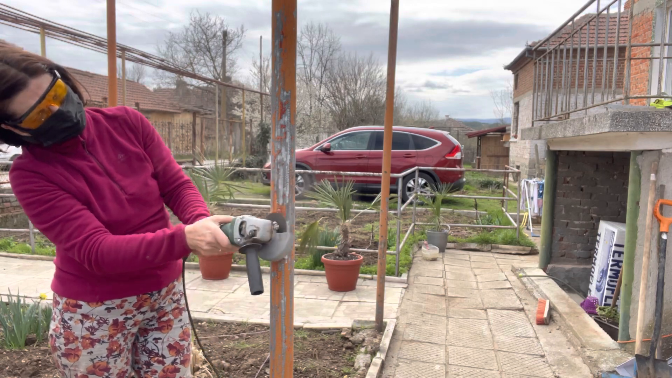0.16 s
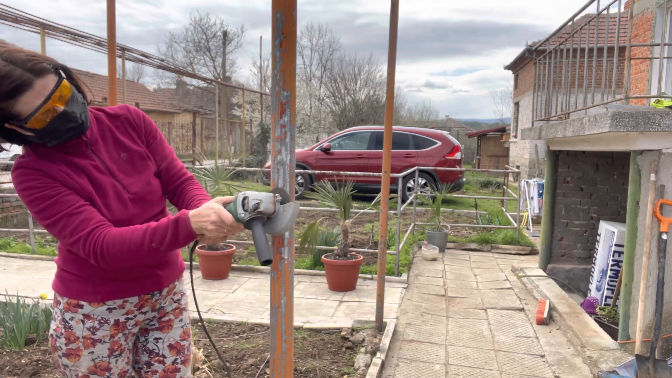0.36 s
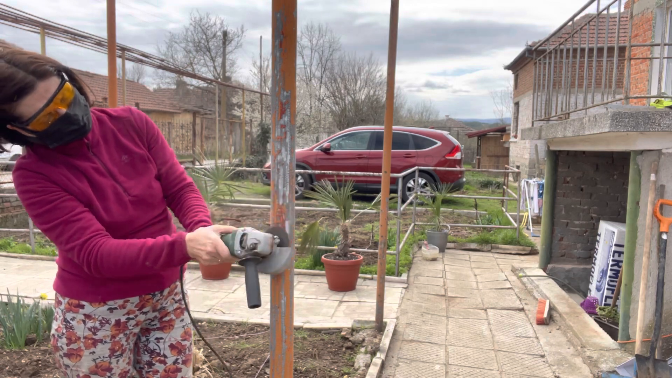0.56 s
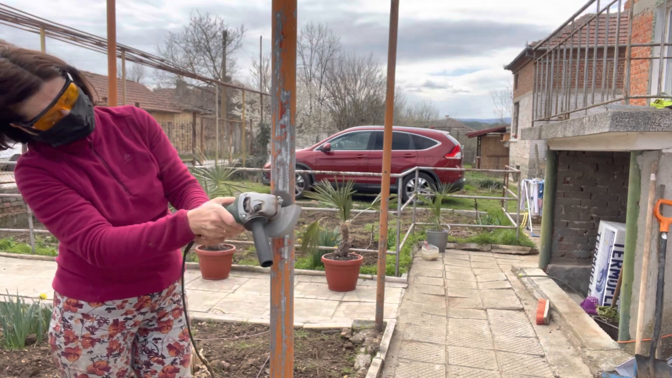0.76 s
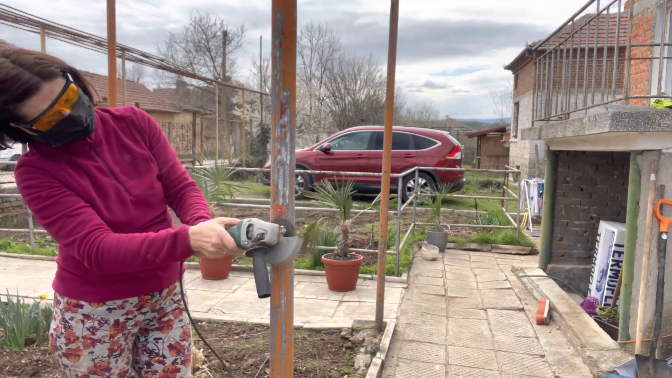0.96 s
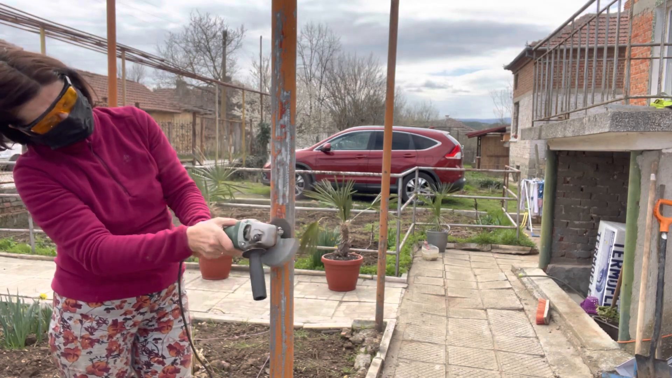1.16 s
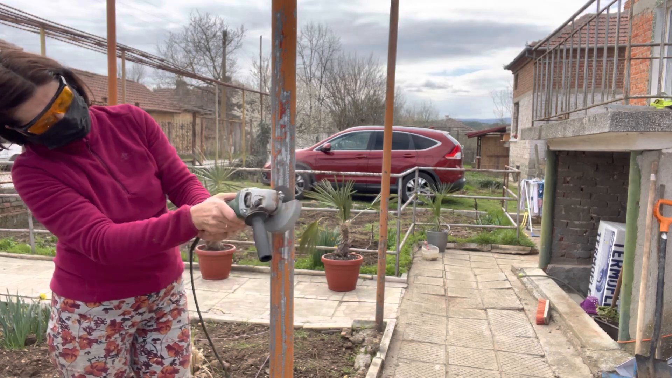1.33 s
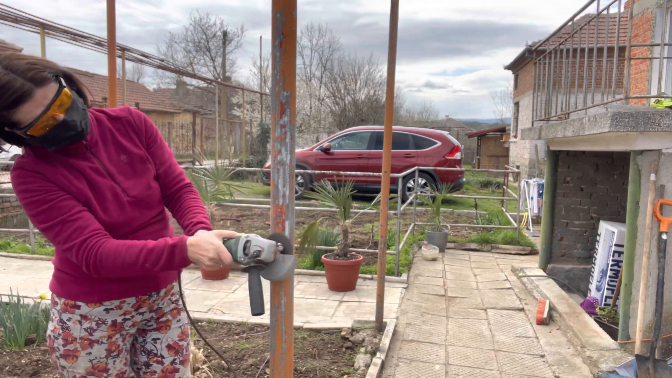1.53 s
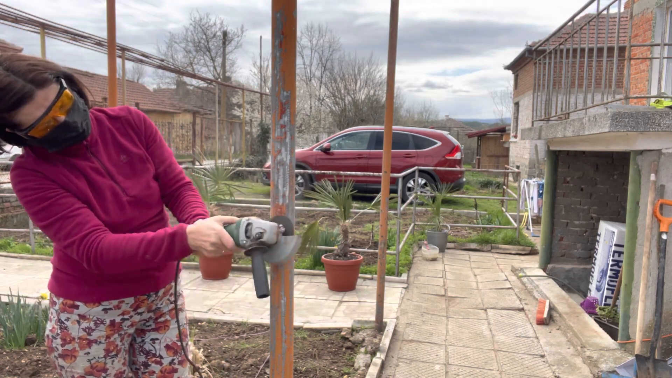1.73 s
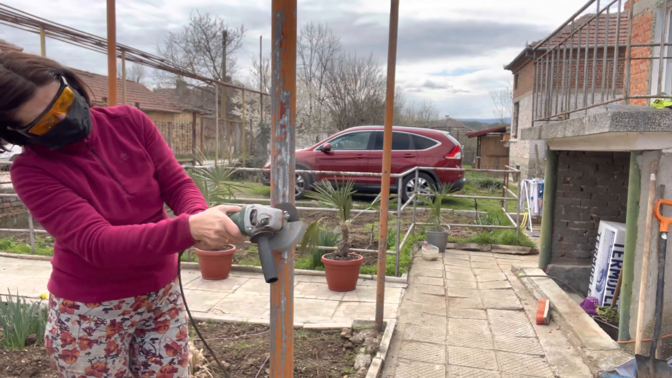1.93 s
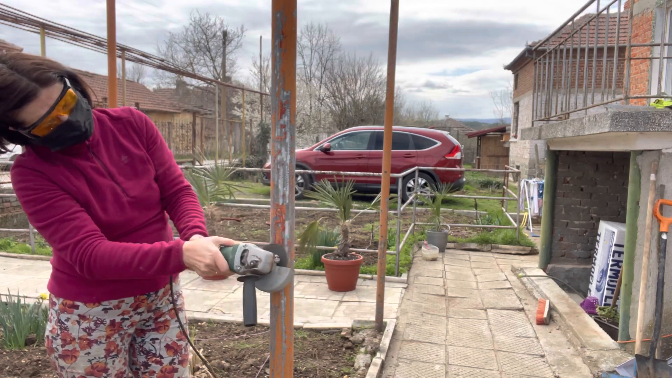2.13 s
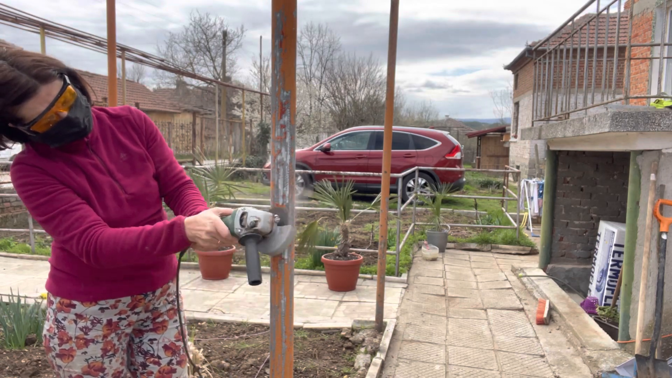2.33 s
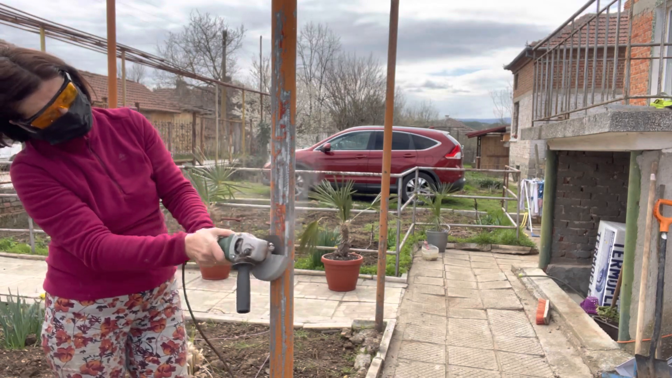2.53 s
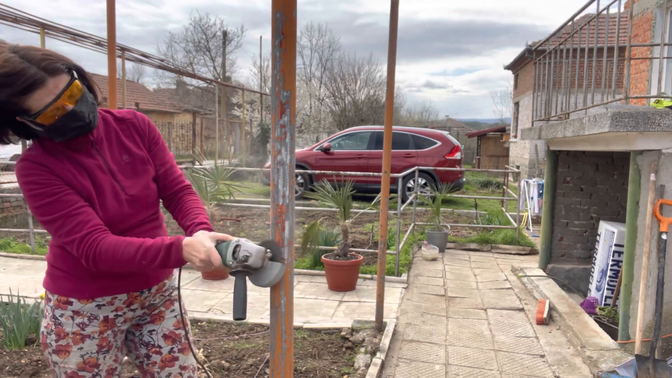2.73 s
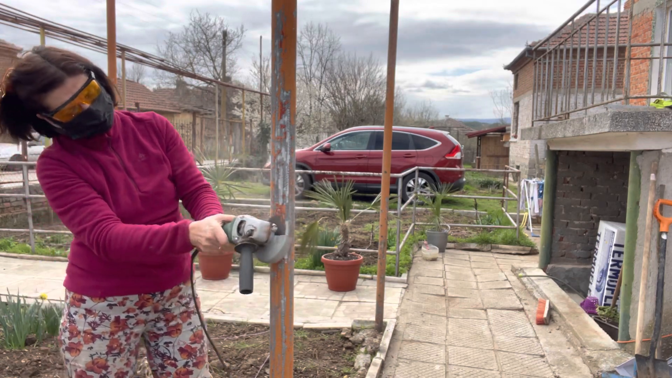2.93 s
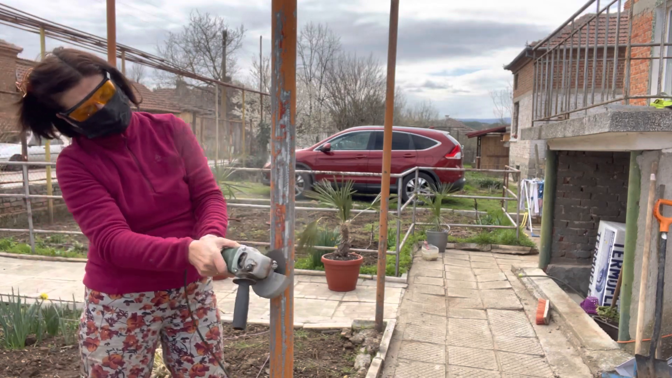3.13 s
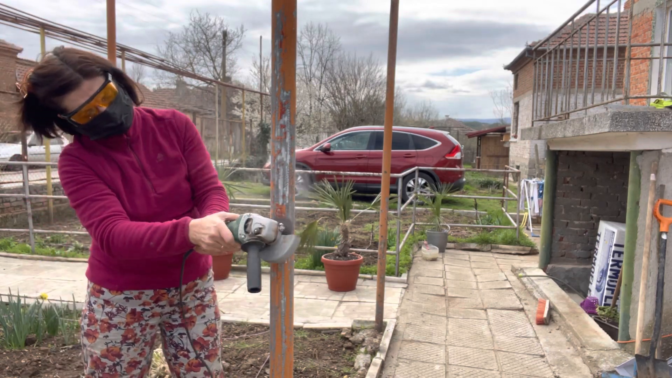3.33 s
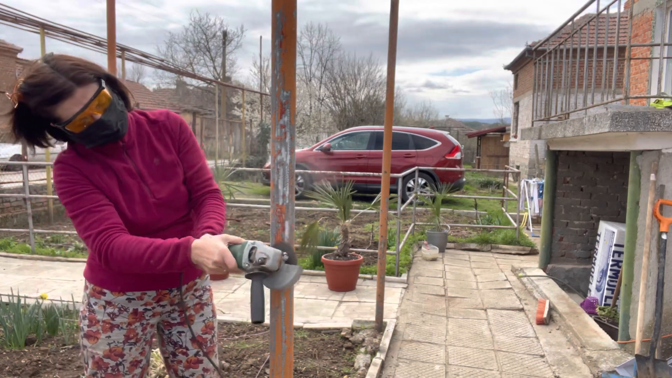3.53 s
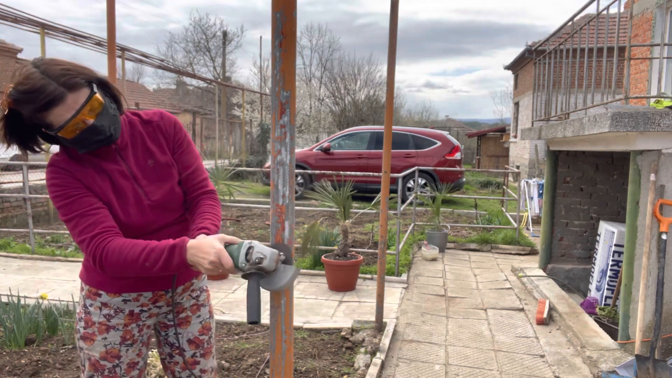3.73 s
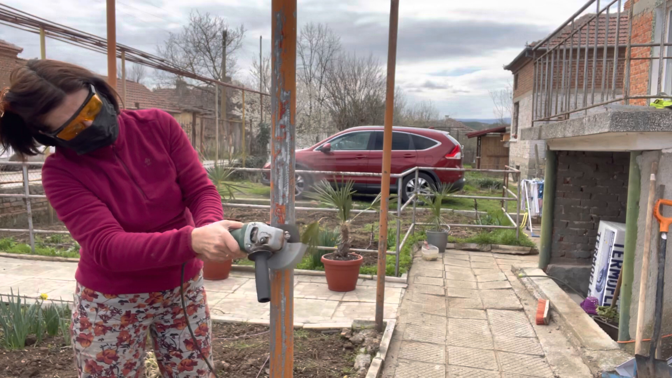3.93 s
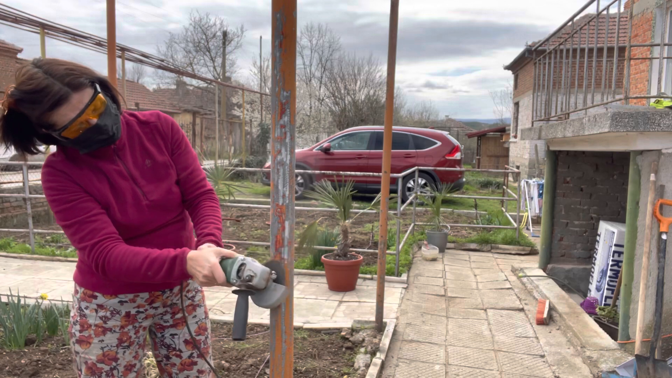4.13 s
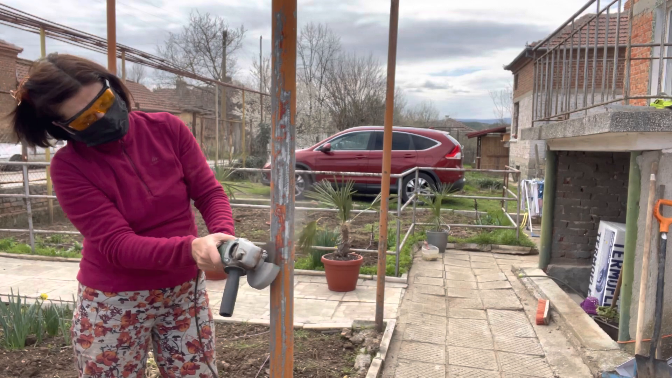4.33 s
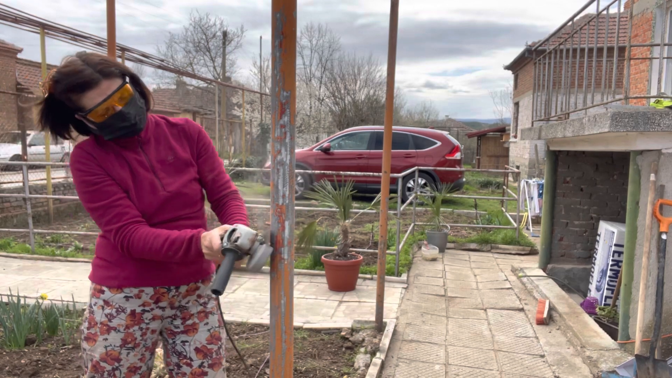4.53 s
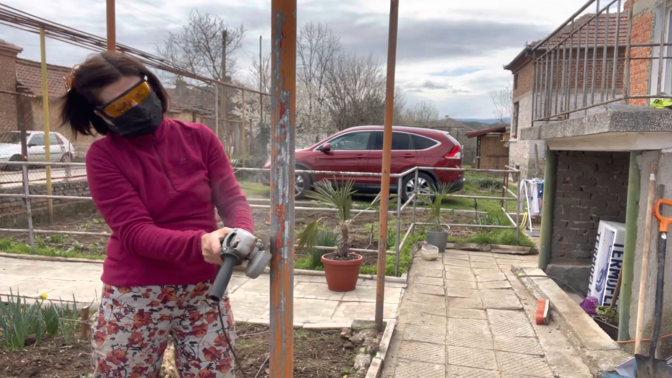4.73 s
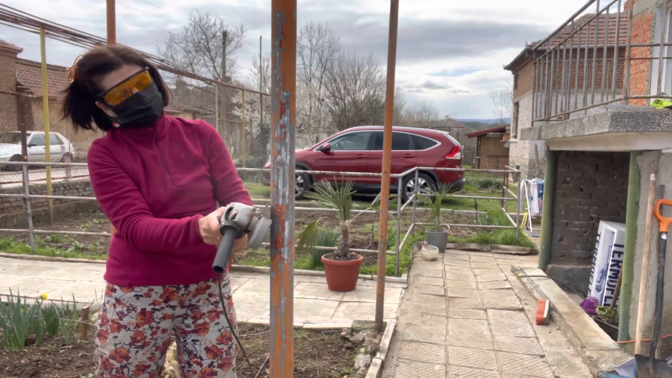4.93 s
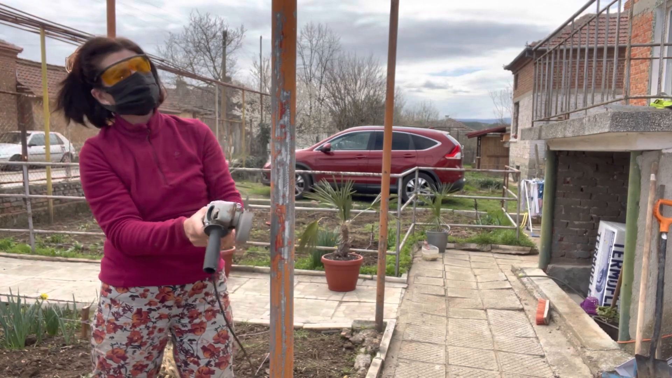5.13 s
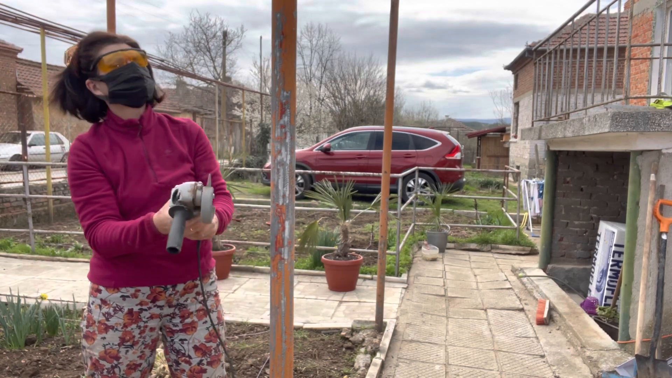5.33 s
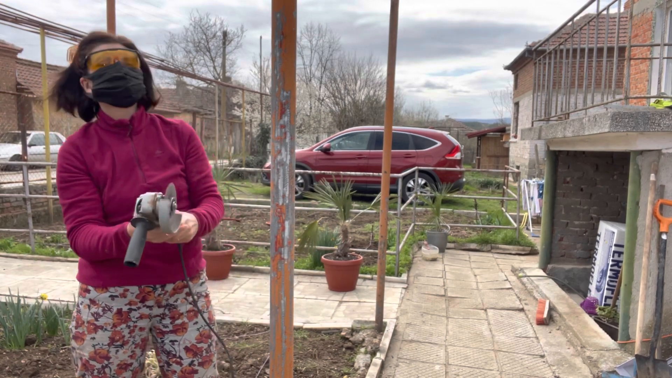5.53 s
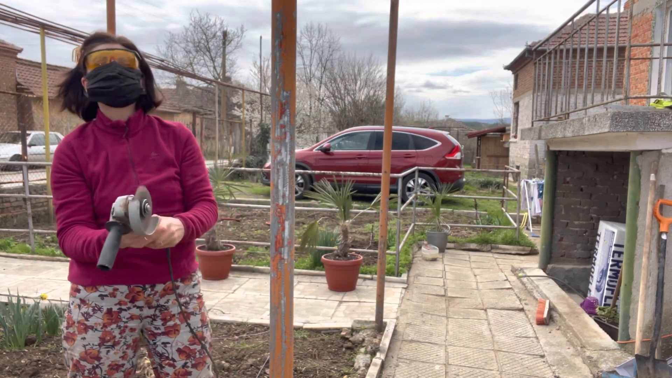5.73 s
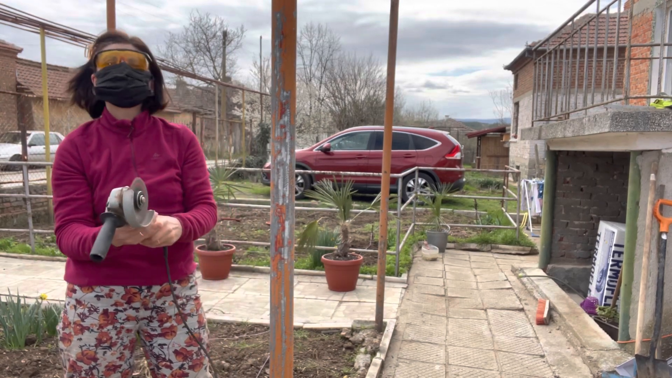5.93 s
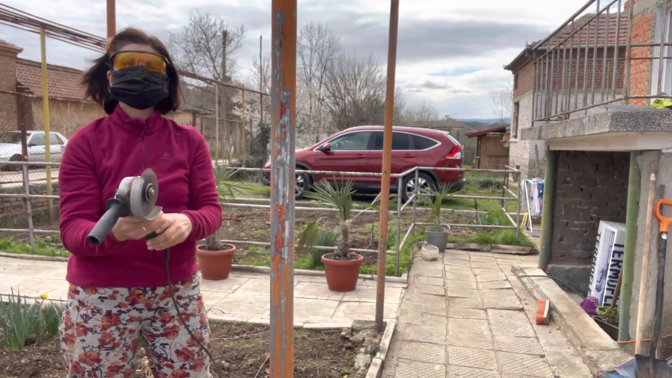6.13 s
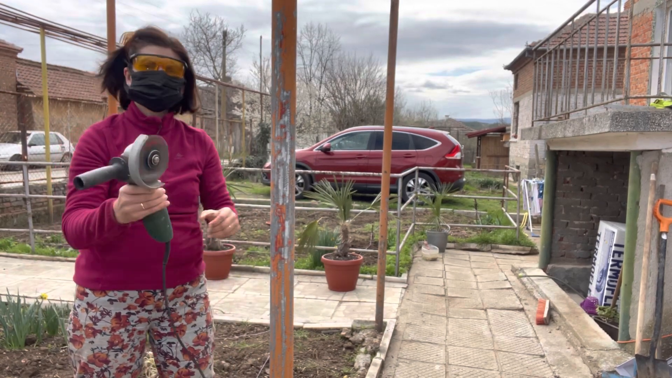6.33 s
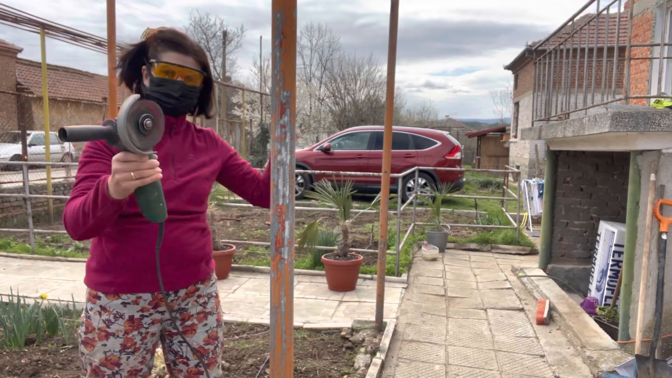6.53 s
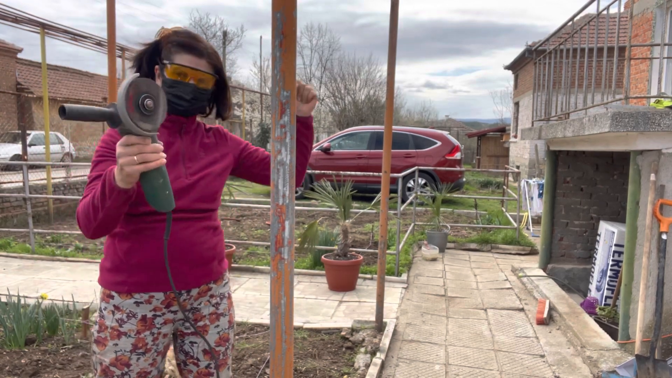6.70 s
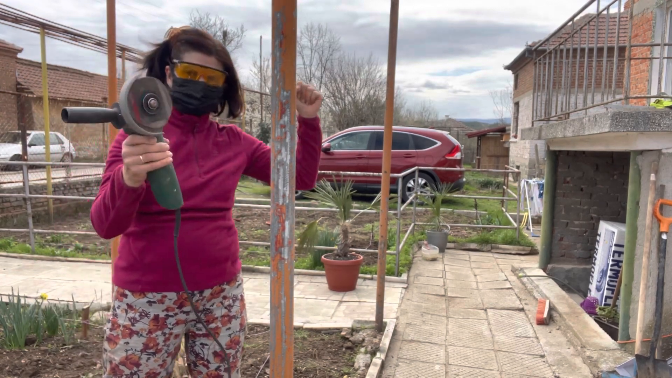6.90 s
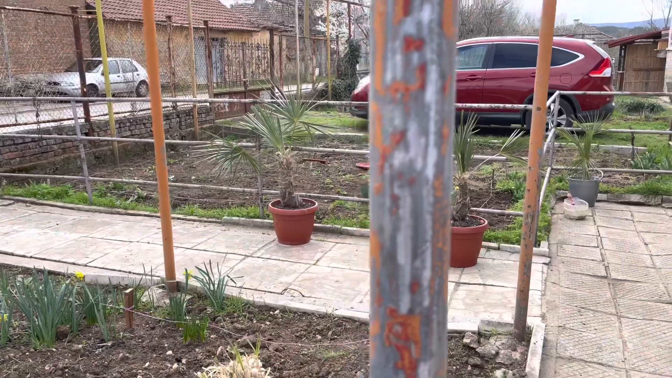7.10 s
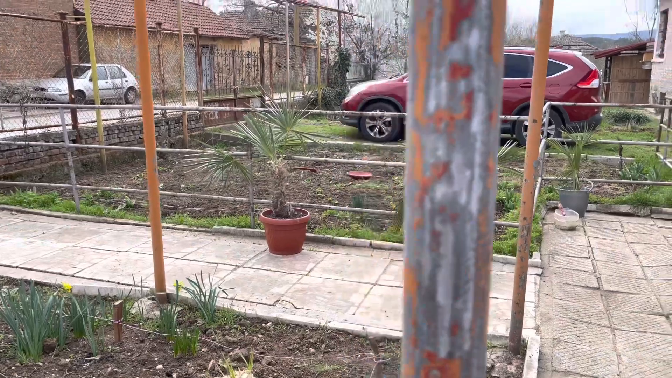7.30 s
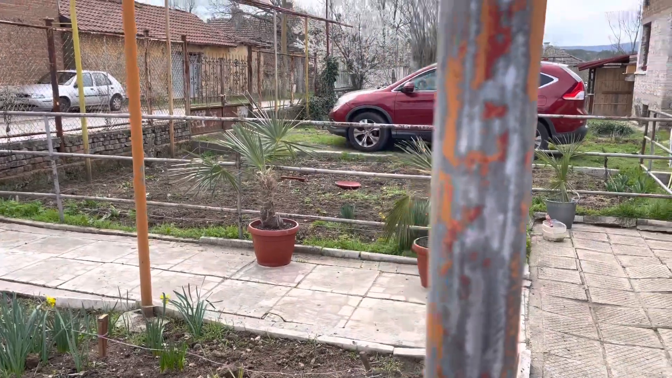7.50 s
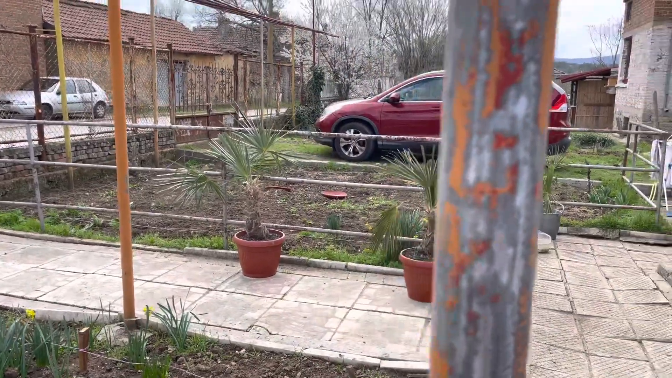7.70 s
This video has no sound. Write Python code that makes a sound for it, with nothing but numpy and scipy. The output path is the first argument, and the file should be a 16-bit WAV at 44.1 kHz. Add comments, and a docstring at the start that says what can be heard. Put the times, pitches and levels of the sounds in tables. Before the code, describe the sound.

Outdoors, fairly close, an angle grinder is already pressed to a rusty steel post. From 0 to about 4.7 s it works in overlapping strokes roughly half a second long: a dense rough buzz, rapid chatter and bright gritty hiss, with short singing overtones and metallic ringing. The speed sags slightly under pressure, and the bites become harsher around 3.6 to 4.4 s. At 4.7 s the motor is switched off; pitch drops and the scraping thins, ending near 5.2 s with fading post ring and small ticks. The freed tool whirrs down, its gear whine gliding lower over fan rush and brush fizz, with faint gear ticking near 7 s. Wind buffets thump the microphone, strongest around 6.4 s. At 7.3 s everything breaks off. After a tiny gap, low wind returns with clicks, finger rubs and taps on a case until nearly 7.8 s.

```python
"""An open yard: an angle grinder scours a rusty steel post, is switched off, lifted away and winds down.
The disc's rotation drives knocks, chattering bumps and overtones; noise makes its grit hiss; the post rings along.
Gear and brush tones glide down with the speed, while filtered noise makes the wind on the microphone.
Near 7.3 s everything stops abruptly; after a brief gap the wind returns and fingers slide and tap on a case."""
import sys
import numpy as np
from scipy import signal
from scipy.fft import rfft, irfft
from scipy.io import wavfile
from scipy.ndimage import uniform_filter1d, map_coordinates

SR = 44100
rng = np.random.default_rng(int(sys.argv[2]) if len(sys.argv) > 2 else 0)


def master(y):
    """Save y as 16-bit WAV."""
    cut = np.clip(np.atleast_2d(y).T, -1, 1)
    pcm = np.round(cut * 32767)  # scale
    wavfile.write(sys.argv[1], SR, pcm.astype(np.int16))


N = 342216
T, HZ = np.arange(N) / SR, np.fft.rfftfreq(N, 1 / SR)
EDGE_HZ = 15850  # upper limit of the whole sound
GEAR = 3.5  # motor turns per spindle turn
STOP_S = 7.305  # the tool and the first wind break off


def amp(db):
    """Decibels to gain."""
    return 10 ** (np.asarray(db) / 20)


def unit(x):
    """Scales to an rms of 1."""
    return x / np.sqrt(np.mean(x ** 2) + 1e-20)


def curve(rows):
    """Joins (time, value) rows by straight lines, at every sample."""
    rows = np.asarray(rows)
    return np.interp(T, rows[:, 0], rows[:, 1])


def read(points):
    """Joins (frequency, value) points along a logarithmic frequency axis."""
    hz, value = np.transpose(points)
    return np.interp(np.log(HZ + 1), np.log(hz), value)


def colour(x, points):
    """Filters by a spectrum table, then scales to an rms of 1."""
    return unit(irfft(rfft(x) * amp(read(points)), N))


def ring(x, modes):
    """Passes x through a set of parallel resonances."""
    response = sum(amp(db) / (1 + 2j * (HZ - hz) / width) for hz, width, db in modes)
    return irfft(rfft(x) * response, N)


def noise():
    """White noise."""
    return rng.standard_normal(N)


def wander(rate_hz):
    """Slow random drift of rms 1, with two new targets per cycle of its rate."""
    steps = rng.standard_normal(size=40000)
    return unit(np.interp(2 * rate_hz * T, np.arange(len(steps)), steps))


def fade(s, length):
    """Rises from 0 to 1, centred on the time s."""
    return np.clip((T - s) / length + .5, 0, 1)


def arch(start, length):
    """Swells from 0 to 1 and back."""
    return np.sin(np.pi * np.clip((T - start) / length, 0, 1))


def rotation_pulse(turns, depth, second):
    """Strongest once a turn, with a twice-a-turn part, as when a tilted disc presses; rms 1."""
    angle = 2 * np.pi * (turns + 0.12 * wander(2.7))
    return unit(np.exp(depth * np.cos(angle) + second * np.cos(2 * angle)))


def stereo_pair(x, phase, scatter_db=0):
    """Splits x in level and phase between left and right, plus differing scatter from paving and walls."""
    # left against right: hz, left_minus_right_db (used below 8 kHz)
    balance = [(300, -1.5), (600, 0), (1400, 0), (2450, -2.5), (2750, -9.5), (3000, 9), (3700, -1),
               (5800, 2.5), (6800, 2.5), (7700, 4.5), (15000, -4)]
    # scattered sound before the scatter_db offset: hz, level_db
    scatter = [(300, -8.5), (1500, -10.5), (3500, -8), (7000, 0), (8300, -43.5), (10500, -70.5),
               (14000, -18)]
    tilt_db = np.outer([.5, -.5], read(balance) * (HZ < 8000))
    lead_rad = np.outer([.5, -.5], read(phase))
    unscattered = rfft(x) * amp(tilt_db) * np.exp(1j * lead_rad)
    echoes = rng.standard_normal((2, N)) * amp(-60 * T / 0.18) * (T > .003)  # 60 dB down in 0.18 s
    echoes /= np.linalg.norm(echoes, axis=1, keepdims=True)
    return irfft(unscattered * (1 + amp(scatter_db + read(scatter)) * rfft(echoes)), N)


def spindle_speed():
    """Turns per second: driven until the switch-off, then braked by the post, bearings and fan."""
    # driven speed, sagging under pressure: time_s, speed_turns_per_s
    driven = [(0, 144.2), (.67, 143.7), (1.0, 141.9), (1.35, 139.5), (1.57, 139.2), (1.7, 137.6),
              (1.82, 138.7), (1.96, 138.6), (2.33, 140.2), (2.45, 139.0), (2.8, 139.1), (2.9, 137.6),
              (3.32, 138.7), (3.41, 137.1), (3.66, 135.5), (3.76, 137.1), (3.91, 134.7), (4.24, 137.3),
              (4.42, 135.5), (4.54, 137.6), (4.7, 135.7)]
    off_s, free_s, crawl_s = 4.7, 5.16, 6.6
    post_brake, bearing_brake, crawl_brake = 74.3, 36.7, 1.15  # turns per s, lost each second
    fan_loss, fan_loss_s = 2.0, .3  # turns per s lost in all; time constant
    braked = np.clip(T, off_s, free_s) - off_s
    free = np.maximum(T - free_s, 0)
    crawling = np.maximum(T - crawl_s, 0)
    loss = post_brake * braked + bearing_brake * free + fan_loss * (1 - np.exp(-free / fan_loss_s))
    return np.maximum(curve(driven) - loss - crawl_brake * crawling, 1)


def strokes():
    """Levels in dB: each stroke moves from the between-stroke levels to its own, louder or softer, and eases back."""
    # strokes along the post, before later trims: start_s, length_s, chatter_db, grit_db, knocking_db
    passes = [(-.1, 0.62, -30, -38.5, -39.5), (0.35, 0.43, -28, -37.5, -39.5),
              (0.74, 0.52, -26.5, -37, -40.5), (1.194, 0.53, -26.5, -36.5, -34.5),
              (1.744, 0.48, -26, -36.5, -38), (2.251, 0.46, -25.5, -36, -35), (2.72, 0.35, -26, -36.5, -36),
              (2.991, 0.31, -29.5, -36, -37.5), (3.265, 0.42, -26, -36, -39),
              (3.737, 0.17, -23, -37.5, -31.5), (3.825, 0.34, -23.5, -37.5, -42),
              (4.133, 0.39, -23, -39.5, -39.5), (4.502, 0.26, -27, -36, -37.5),
              (4.69, 0.65, -28.5, -40.5, -47)]
    # between strokes, before the same trims: chatter_db, grit_db, knocking_db
    between_db = [-26.5, -41, -40]
    press_s, ease_s = 0.096, 0.21
    between = np.array(between_db)[:, None]
    holds = np.array([np.clip(np.minimum((T - s) / press_s, (s + length - T) / ease_s), 0, 1)
                      for s, length, *_ in passes])
    holds = np.sin(np.pi / 2 * holds)
    shares = holds / np.maximum(holds.sum(axis=0), 1)  # overlapping strokes blend
    return between + (np.array(passes).T[2:] - between) @ shares


def knocking(turns, knock_db):
    """Low orders of the rotation: odd ones follow the stroke, even ones how flat the disc is pressed."""
    # partials of the knock: multiple_of_spindle_speed, relative_level_db
    orders = [(3, 2.5), (4, -1), (5, -7.5), (6, -8), (7, -5.5), (8, -11), (9, -9)]
    # how flat and hard the disc is pressed, as a relative level: time_s, pressure_db
    press_points = [(0.0, -62), (0.28, -66), (0.37, -52), (0.56, -51.5), (0.6, -69.5), (0.94, -44.5),
                    (1.18, -49), (1.33, -42), (1.69, -44), (1.76, -55), (1.86, -43.5), (2.26, -48.5),
                    (2.5, -39.5), (2.76, -54.5), (2.87, -41.5), (3.22, -45.5), (3.29, -65), (3.33, -45.5),
                    (3.46, -41), (3.65, -41.5), (3.74, -54), (3.79, -38.5), (3.9, -46.5), (4.03, -38.5),
                    (4.19, -52), (4.29, -39), (4.46, -41), (4.5, -49), (4.69, -42.5), (4.78, -60.5)]
    press_db = curve(press_points)
    level_db = [-16.5 + 0.46 * press_db, knock_db]  # even, odd
    knock = sum(amp(db + level_db[k % 2] + 1.04 * wander(2.466) + 2 * wander(20))
                * np.cos(2 * np.pi * (k * turns + rng.random()) + 0.52 * wander(7)) for k, db in orders)
    wobble_gain = amp(2.0 + press_db + 1.86 * wander(14))
    twice_a_turn = np.cos(2 * np.pi * 2 * turns + 0.22 * wander(8.0))
    return knock + wobble_gain * twice_a_turn


def disc_face(turns, patchy_db, drift, size=512):
    """The bumps round the disc come back every turn; partials swell and drift as the contact patch creeps."""
    order = np.arange(size // 2 + 1)
    swell, slip = rng.standard_normal((2, 330, len(order)))
    height = amp(patchy_db * unit(uniform_filter1d(swell, size=3, axis=0)))
    height = height * (order > 6) / (1 + (order / 42) ** 4)
    height /= np.linalg.norm(height[:, 12:20], axis=1, keepdims=True)
    phase = 2 * np.pi * rng.random(len(order)) + drift * np.cumsum(slip, axis=0)
    face = irfft(height * np.exp(1j * phase), size)  # 40 profiles a second, blended
    return unit(map_coordinates(face, [T * 40, turns % 1 * size], order=1, mode="grid-wrap"))


def disc_song(turns):
    """For a moment the disc locks into one overtone of its rotation and sings, a little unsteadily."""
    # sung overtones, before wavering: start_s, length_s, multiple_of_spindle_speed, peak_db
    songs = [(.03, .17, 13, -32), (.15, .62, 14, -33), (.17, .6, 16, -34), (.83, .16, 15, -33),
             (.86, .13, 13, -32), (1.0, .2, 15, -34), (1.02, .2, 16, -34), (1.26, .36, 18, -30),
             (1.26, .22, 19, -32), (1.27, .38, 26, -36), (1.48, .15, 23, -34), (1.5, .12, 13, -32),
             (1.5, .12, 11, -33), (1.64, .18, 15, -32), (1.85, .17, 15, -31), (1.85, .16, 12, -31),
             (1.88, .13, 19, -33), (2.15, .3, 16, -35), (2.3, .16, 15, -30), (2.33, .2, 12, -30),
             (2.62, .14, 17, -34), (3.3, .35, 12, -35), (3.33, .3, 21, -35), (3.7, .08, 17, -29),
             (3.86, .11, 13, -28), (3.93, .12, 16, -27), (3.93, .1, 19, -28), (3.93, .1, 18, -29),
             (3.97, .13, 15, -30), (4.17, .13, 17, -28), (4.24, .17, 19, -29), (4.24, .18, 15, -30),
             (4.25, .17, 18, -30), (4.54, .12, 16, -31), (4.54, .12, 18, -32)]
    return sum(amp(db + 2.6 * wander(22)) * np.sqrt(np.maximum(arch(s, length), 0))
               * np.cos(2 * np.pi * (order * turns + rng.random()) + .25 * wander(30))
               for s, length, order, db in songs)


def post_ring(turns, count=30):
    """The post sings when an overtone of the disc meets one of its modes; grit stirs them a little too."""
    # steel post, passed through twice: mode_hz, width_hz, level_db (each for one pass)
    modes = [(860, 30, -8), (1740, 40, -8), (2440, 30, -6), (2878, 48, 0), (3190, 45, -7.5), (3600, 50, -6)]
    # how well the contact spot excites the post: time_s, gain_db
    bite = [(0, -43), (.3, -35), (.42, -42), (.62, -35), (.85, -43), (2.5, -41), (3.4, -38.5), (3.8, -38),
            (4.3, -36), (4.48, -41), (4.62, -34), (4.8, -39)]
    overtones = sum(np.sqrt(2) * np.cos(2 * np.pi * (k * turns + rng.random())) for k in range(5, count))
    drive = overtones + amp(16) * noise()
    return ring(ring(drive, modes), modes) * amp(curve(bite))


def grinding(turns):
    """The disc on the post: rotation knocks, repeating bumps chatter, noisy grit hisses, and the steel rings."""
    # rust catches the disc (louder) or it skids (quieter): peak_s, half_length_s, rise_db
    catches = [(0.654, 0.063, 0.5), (0.757, 0.054, -0.5), (0.88, 0.1, 1.5), (1.034, 0.055, 3.5),
               (1.166, 0.045, -0.5), (1.29, 0.099, 2.5), (1.586, 0.061, 2.5), (1.685, 0.11, 1.5),
               (1.954, 0.032, 0), (2.028, 0.028, -3.5), (2.1, 0.044, 1), (2.36, 0.14, 2), (2.906, 0.026, 1),
               (3.12, 0.059, -3.5), (3.195, .05, 2), (3.362, 0.038, 1.5), (3.653, 0.07, 5), (3.7, .035, -3),
               (3.807, 0.053, 4.5), (4.057, 0.03, 5), (4.29, 0.064, 2.5), (4.387, 0.05, 2.5),
               (4.584, 0.052, 1.5), (5.006, 0.091, 3.5)]
    # colour of the chatter: hz, relative_db_per_hz
    chatter_colour = [(150, -32), (300, -17.5), (900, -15), (1300, -12), (1650, -0.5), (2100, 1.5),
                      (2600, -1), (3050, -8.5), (3600, -5.5), (4100, -11.5), (5000, -11.5), (6100, -11),
                      (7300, -29.5), (15500, -25)]
    # thinner chatter once the motor is off: hz, relative_db_per_hz
    skim_colour = [(150, -35), (300, -25), (900, -22), (1300, -11), (1650, -6.5), (2100, 1), (2600, 0.5),
                   (3050, -4.5), (3600, -15), (4100, -9), (5000, -21), (6100, -12.5), (7300, -15.5),
                   (15500, -28)]
    # colour of the grit hiss: hz, relative_db_per_hz
    grit_colour = [(150, -27), (500, -8.5), (1500, 0.5), (3500, 1.5), (4300, 0), (5200, 3.5), (6200, 5),
                   (7200, 3), (7800, 10.5), (8400, 7), (10000, 5.5), (11300, 1), (13400, 1), (14400, 1.5),
                   (15600, 3)]
    lift_db_per_s, knock_lift_db_per_s = 44, 123
    chatter_db, grit_db, knock_db = strokes()
    catch_db = sum(db * arch(s - length, 2 * length) ** 2 for s, length, db in catches)
    lifted_s = np.maximum(T - 5.094, 0)  # time since the disc began to be drawn off
    turns = turns + 0.0039 * wander(21.6)  # the speed trembles as the disc catches
    knock = knocking(turns, knock_db) * amp(0.089 * catch_db - knock_lift_db_per_s * lifted_s)

    skipping = np.clip(0.15 + 0.1 * catch_db, 0, 1)  # irregular share, larger in a catch
    regular = np.sqrt(1 - skipping) * disc_face(turns, patchy_db=4, drift=.4)
    bumps = regular + np.sqrt(skipping) * noise() * 1.7
    # one burst a turn, sharper in a catch
    bumps = bumps * rotation_pulse(turns, depth=.36 + .04 * catch_db, second=0.096)
    turn_db = 1.1 * rng.standard_normal(size=2000)
    bumps = bumps * amp(turn_db[turns.astype(int)])  # no two turns bite alike
    skimming = fade(4.84, .3)
    chatter = (1 - skimming) * colour(bumps, chatter_colour) + skimming * colour(bumps, skim_colour)
    chatter = chatter * amp(chatter_db + catch_db - 1.0 + 0.37 * wander(35))

    grains = noise() * amp(1.0 * wander(1500))  # single grains tear off flakes of rust
    grit = colour(grains * rotation_pulse(turns, depth=0.11, second=0.14), grit_colour)
    grit = grit * amp(grit_db + 10.5 + 0.83 * wander(30))
    scouring = (chatter + grit) * amp(-lift_db_per_s * lifted_s)
    contact = 1 - fade(5.208, 0.08)
    return contact * (knock + scouring + disc_song(turns) + post_ring(turns))


def whine(motor, count=70):
    """Gear-mesh and commutator tones stand over a weaker comb of motor orders, through the gear head."""
    # tones before the gear head and facing gains: multiple_of_motor_speed, level_db, fade_centre_s
    lines = [(12, -60, 6.9), (16, -64, 7.05), (18, -60, 7.05), (20, -66, 6.9), (22, -69, 6.95),
             (24, -65, 7.35), (26, -68, 6.6), (27, -69, 6.6), (30, -67, 6.8), (32, -70, 6.8),
             (36, -62, 7.05), (38, -68, 6.95), (40, -66, 7.05), (44, -66, 6.9), (48, -64, 7.28),
             (60, -66, 7.25), (72, -68, 7.25), (84, -70, 7.3), (96, -70, 7.3)]
    # gear-head resonances; each tone flares as it glides through: hz, gain_db
    housing = [(800, -8), (1300, -6), (1750, -1), (2000, -5), (2250, 0), (2450, -6), (2720, 3), (3000, -8),
               (3500, 0), (3900, -8), (4400, -5), (4950, 3), (5500, -6), (6000, -6), (6600, 0), (7300, -8),
               (8500, -9), (12000, -10), (15000, -15)]
    motor_hz = GEAR * spindle_speed()
    tones = sum(amp(db + 1.5 * wander(6)) * (1 - fade(end, .25)) * (k * motor_hz < EDGE_HZ)
                * np.cos(2 * np.pi * (k * motor + rng.random())) for k, db, end in lines)
    angle = np.linspace(0, 2 * np.pi, 4096)
    one_turn = sum(rng.rayleigh() * np.cos(k * angle + 2 * np.pi * rng.random()) for k in range(13, count))
    comb = unit(np.interp(2 * np.pi * (motor % 1), angle, one_turn))
    comb = comb * amp(-56) * (1 - fade(6.9, .5))
    return irfft(rfft(tones + comb) * amp(read(housing)), N)


def backlash(turns):
    """At low speed the unloaded gear teeth tick against each other about once a turn."""
    new_turn = np.diff(np.floor(turns + .15 * wander(20)), prepend=0) > 0
    strength = amp(3 * np.clip(noise(), -2, 1)) * fade(7.03, 0.39) * (T < STOP_S)
    return amp(-78.0) * unit(ring(new_turn * strength, [(2090, 150, 0)]))


def running_tool(turns):
    """Fan rush dies with the speed among brush fizz, while gear and commutator lines glide down."""
    # fizz of the brushes as the tool is turned about: time_s, level_db
    fizz_db = [(5.3, -52), (5.6, -52.5), (6.1, -58.5), (6.5, -58.5), (6.85, -54.5), (7.29, -58)]
    # whine gain, growing as the gear head turns to the microphone: time_s, gain_db
    facing = [(5.3, -7), (5.8, -5), (6.3, -2), (6.6, 2), (6.95, 3), (7.29, 0)]
    # colour of the fan: hz, relative_db_per_hz
    rush_colour = [(100, -24.5), (300, -12.5), (700, -9.5), (1000, -2), (1250, -4.5), (1700, 0.5),
                   (2100, -2), (2600, -2), (3300, -20), (4500, -16), (8000, -11), (15000, -51)]
    # colour of the brushes: hz, relative_db_per_hz
    fizz_colour = [(1500, -17.5), (3300, -5), (4500, -9), (6000, -5), (7500, 3.5), (8400, 8.5),
                   (10500, -2.5), (13000, 5), (15600, -5.5)]
    motor = turns * GEAR + .0005 * wander(20)
    rush_db = -48 + 24 * np.log10(spindle_speed() / 90)
    rush = colour(noise() * rotation_pulse(turns, depth=0.18, second=0.074), rush_colour) * amp(rush_db)
    fizz = colour(noise() * rotation_pulse(motor, depth=0.21, second=.1), fizz_colour) * amp(curve(fizz_db))
    return amp(curve(facing)) * whine(motor) + backlash(turns) + rush + fizz


def thumps():
    """Single eddies strike the microphone: a few soft low cycles each."""
    # low thumps: centre_s, pitch_hz, half_length_s, peak_db
    eddies = [(6.373, 84.7, 0.013, -49), (6.43, 135, 0.016, -46), (6.473, 283, 0.013, -39.5),
              (6.547, 70, .02, -50), (6.757, 330, .014, -50), (7.094, 400, 0.0053, -49),
              (7.632, 130, 0.013, -44), (7.682, 191, .008, -40.5)]
    return sum(amp(db) * np.exp(-((T - s) / width) ** 2) * np.cos(2 * np.pi * (hz * (T - s) + rng.random()))
               for s, hz, width, db in eddies)


def wind():
    """Lumpy rumble and flutter, mostly separate noise left and right; flutter thins in the gusts before the stop."""
    # steady rumble before its lumps: time_s, level_db
    rumble_db = [(0, -57.5), (1.5, -65), (4.7, -62), (5.3, -59.5), (6.55, -61.5), (6.88, -95), (7.29, -96),
                 (7.35, -57.5), (7.76, -64)]
    # single buffets: start_s, length_s, flutter_db (before its lumps), rumble_db
    gusts = [(5.068, 0.092, -82, -57), (5.292, 0.043, -82, -73), (5.438, 0.055, -80, -63),
             (5.69, 0.074, -80, -56), (6.12, 0.044, -80, -57), (6.387, 0.077, -44.5, -48),
             (6.448, 0.079, -44, -56), (6.495, 0.16, -50.5, -65), (6.654, 0.16, -51, -78),
             (6.813, 0.054, -51, -90), (6.883, 0.12, -56.5, -99), (7.035, 0.13, -52.5, -99),
             (7.138, 0.15, -54, -99), (7.433, 0.19, -60, -58), (7.592, 0.12, -53.5, -58),
             (7.694, 0.082, -53, -68)]
    # colour of the rumble: hz, relative_db_per_hz
    rumble_colour = [(20, -32.5), (45, -4), (80, 6), (150, -0.5), (230, -5.5), (500, -47), (1500, -68)]
    # colour of the flutter: hz, relative_db_per_hz
    flutter_colour = [(90, -28), (190, 0.5), (300, -1), (450, -8.5), (700, -18.5), (1500, -35), (4000, -55)]
    # colour of the thinner flutter: hz, relative_db_per_hz
    thin_colour = [(180, -49), (280, -8), (400, -1), (600, -3), (800, -11), (2000, -42)]
    rumble_gain = amp(curve(rumble_db) + 3 * wander(8.8))
    rumble_gain = rumble_gain + sum(amp(db) * arch(s, length) for s, length, _, db in gusts)
    flutter_gain = sum(amp(db) * arch(s, length) for s, length, db, _ in gusts) * amp(2.5 * wander(29.8))
    shared = noise()
    rumble = np.array([colour(noise() + 0.15 * shared, rumble_colour) for _ in range(2)])
    thin = fade(6.7, 0.51) * (T < STOP_S)
    air = [2.3 * noise() + shared for _ in range(2)]
    flutter = np.array([(1 - thin) * colour(x, flutter_colour) + thin * colour(x, thin_colour) for x in air])
    return rumble * rumble_gain + flutter * flutter_gain + thumps()


def after_ring():
    """Last grazes ring the post near 3 kHz among small ticks; the upper mode stops as the disc comes clear."""
    # ringing post, before wavering: start_s, pitch_hz, level_db, fall_db_per_s
    rings = [(5.05, 3200, -41, 25), (5.12, 2885, -42, 120), (5.17, 2893, -39, 100), (5.27, 2888, -43, 150),
             (5.35, 2892, -51, 110)]
    # ticks as the disc comes clear: time_s, level_db
    tick_rows = [(5.246, -39), (5.275, -41), (5.322, -40), (5.343, -37), (5.464, -41.5), (5.64, -44.5)]
    # resonances of the ticks: mode_hz, width_hz, relative_level_db
    tick_modes = [(2000, 500, -15), (3020, 600, 11)]
    clear = fade(5.24, .05)
    song = sum(amp(db - fall * np.maximum(T - s, 0) + 1.5 * wander(20))
               * fade(s, .012) * (1 - (hz > 3000) * clear)
               * np.cos(2 * np.pi * (hz * T + rng.random()) + .3 * wander(12)) for s, hz, db, fall in rings)
    decay_s = 0.0051
    ticks = sum(amp(db) * (T >= s) * np.exp(-abs(T - s) / decay_s) for s, db in tick_rows)
    return song + ticks * unit(ring(noise(), tick_modes))


def lingering_hiss():
    """Coloured noise lingers as the disc is drawn clear of the post, falling 22 dB each second."""
    # colour of the hiss: hz, relative_db_per_hz
    hiss_colour = [(1500, -16), (3200, 2.5), (5000, -4), (7500, 1), (9500, -17), (15000, -22)]
    return colour(noise(), hiss_colour) * amp(-46 - 22 * np.maximum(T - 5.2, 0)) * fade(5.2, .05)


def handling():
    """Fingers slide as coloured noise and tap a resonant case in the quiet yard."""
    # taps on the case: time_s, relative_level_db, t60_s (of the weaker tail)
    clicks_at = [(7.367, -32.5, 0.13), (7.372, -34, 0.072), (7.418, -45, 0.055), (7.514, -46, 0.027),
                 (7.584, -38.5, 0.016), (7.609, -46, 0.023)]
    # sliding fingers: start_s, relative_level_db
    slides = [(7.343, -57), (7.372, -56.5), (7.415, -59.5), (7.461, -60.5), (7.732, -68.5)]
    # modes of the case: mode_hz, width_hz, relative_level_db
    case_modes = [(1500, 120, 4), (2000, 240, 9), (3060, 370, -2.5), (4300, 700, -21), (7700, 900, -13)]
    # colour of the sliding: hz, relative_db_per_hz
    slide_colour = [(500, 0), (1150, -2), (1480, 6), (1800, -1), (2800, -7), (4800, -11), (5900, 1),
                    (6700, 2), (7300, -1), (8000, -1), (11300, -2), (12500, -30)]
    # colour of the quiet yard: hz, relative_db_per_hz
    yard_colour = [(60, -8), (400, -2), (900, -5), (1600, -3), (2800, -18.5), (8000, -32), (15000, -40)]
    rise_s, fall_db_per_s = 0.007, 480
    taps = sum(amp(db) * (T >= s) * (np.exp(-abs(T - s) / 0.0012) + 0.23 * amp(-60 * abs(T - s) / t60))
               for s, db, t60 in clicks_at)
    clicks = amp(2.5) * ring(taps * noise(), case_modes)
    rubs = sum(amp(db - fall_db_per_s * np.maximum(T - s - rise_s, 0)) * np.clip((T - s) / rise_s, 0, 1)
               for s, db in slides)
    grip = amp(-79)  # faint steady rubbing, under the same gain as the slides
    slide = np.array([colour(noise(), slide_colour) for _ in range(2)])
    slide = slide * (rubs + grip) * amp(6.5 + 2.0 * wander(80))
    yard = amp(-67.5) * colour(noise(), yard_colour)
    return (clicks + slide + yard) * fade(7.338, .006)


def scene():
    """The tool at the post and held aside until the abrupt stop; wind throughout but for a gap, then handling."""
    # left-right phase of the post's sound, near opposite around 9 and 14 kHz: hz, left_lead_rad
    post_phase = [(100, 0), (2350, -.25), (2800, .9), (3200, -.1), (6300, .3), (7000, -1.5), (7500, -4.2),
                  (8300, -3.14), (9500, -3.14), (10500, -.3), (12400, 0), (13500, 3.14), (15000, 3.14),
                  (15800, 5.6)]
    # left-right phase of the tool's sound, near opposite around 9 and 14 kHz: hz, left_lead_rad
    tool_phase = [(100, 0), (2100, .6), (2750, 2.2), (3300, 1.4), (5000, 2.5), (6200, 1.8), (6900, 3.4),
                  (7650, 1.5), (8400, 3.14), (9500, 3.14), (10600, 6.2), (12400, 6.3), (13400, 9.42),
                  (15100, 9.42)]
    turns = np.cumsum(spindle_speed()) / SR
    contact = stereo_pair(grinding(turns) + after_ring() + lingering_hiss(), post_phase, scatter_db=1.0)
    tool = contact + stereo_pair(running_tool(turns), tool_phase, scatter_db=2.5)
    before_stop = 1 - fade(STOP_S - .01, 0.03)
    wind_returns = fade(7.328, .024)
    return tool * before_stop + wind() * (before_stop + wind_returns) + handling()


def record(dry):
    """Limits the band with a steep low-pass at EDGE_HZ."""
    low_pass = signal.firwin(511, EDGE_HZ, window=("kaiser", 9), fs=SR)
    return signal.oaconvolve(dry, low_pass[None], "same")


dry = scene()
out = record(dry)
master(out)
```